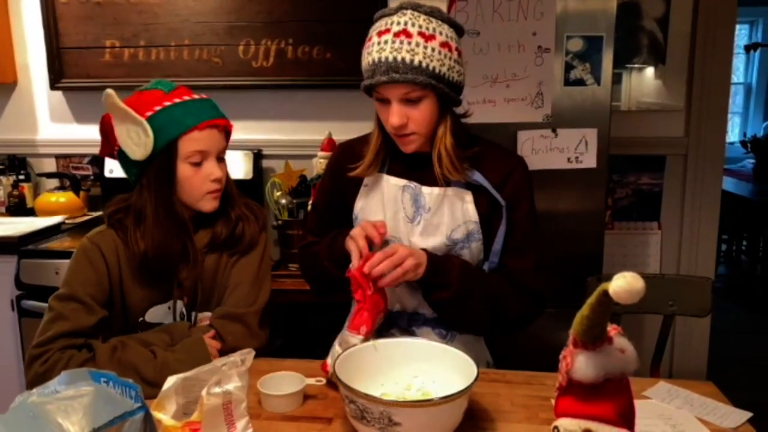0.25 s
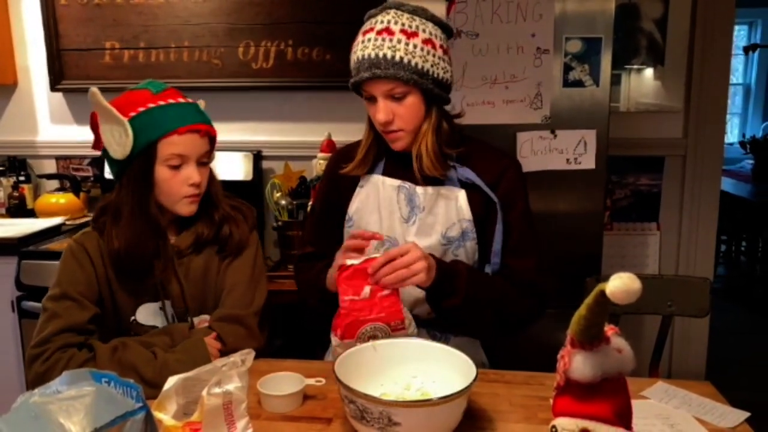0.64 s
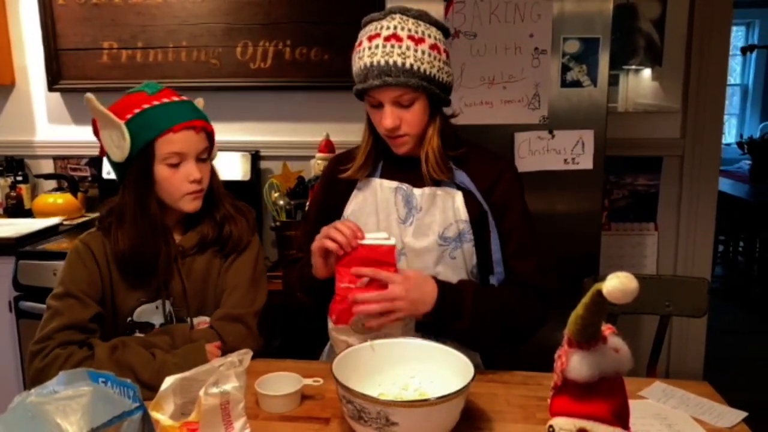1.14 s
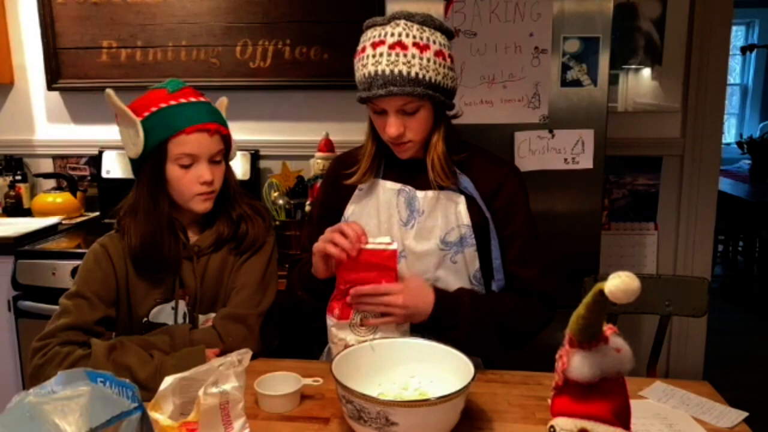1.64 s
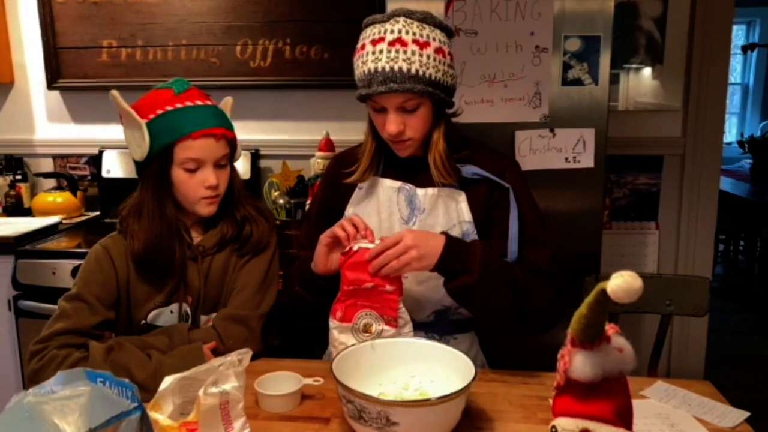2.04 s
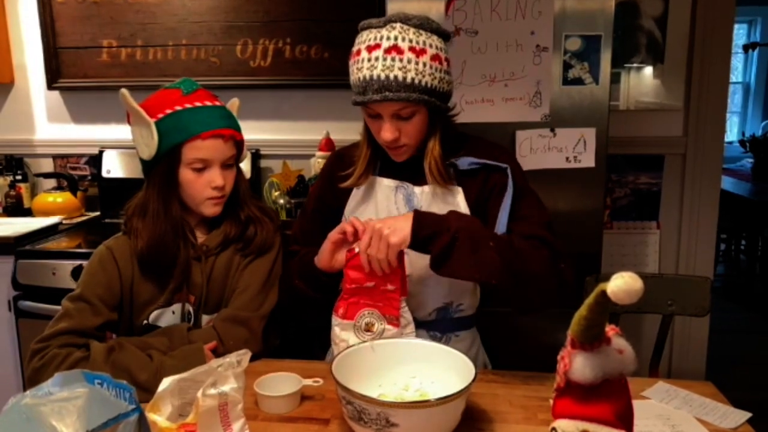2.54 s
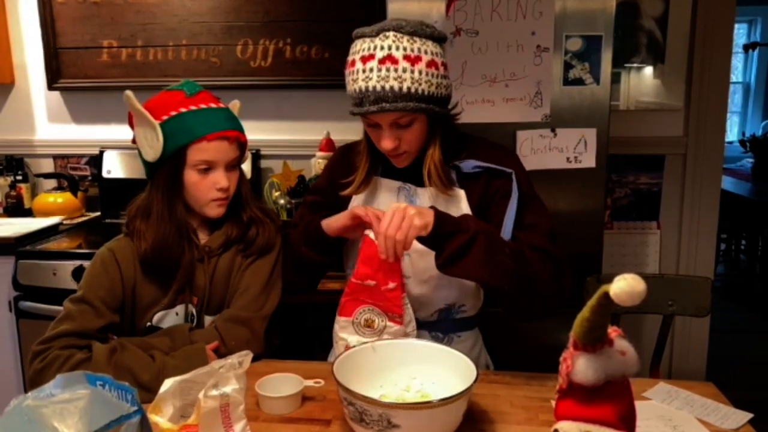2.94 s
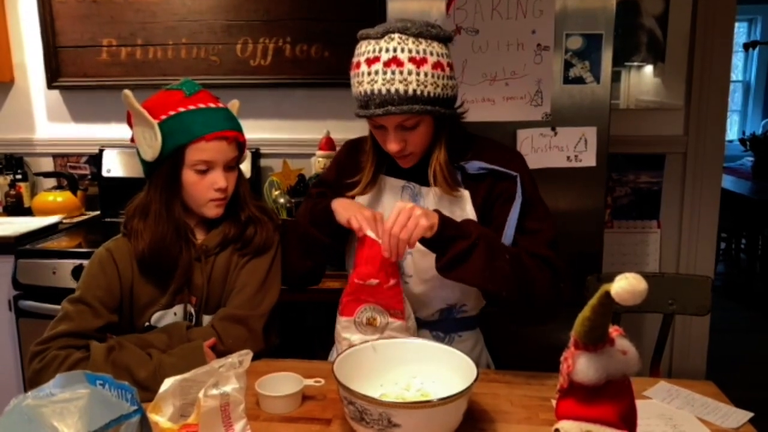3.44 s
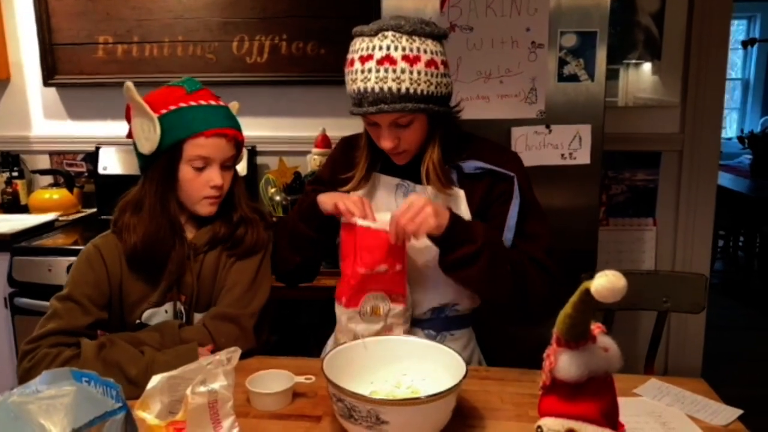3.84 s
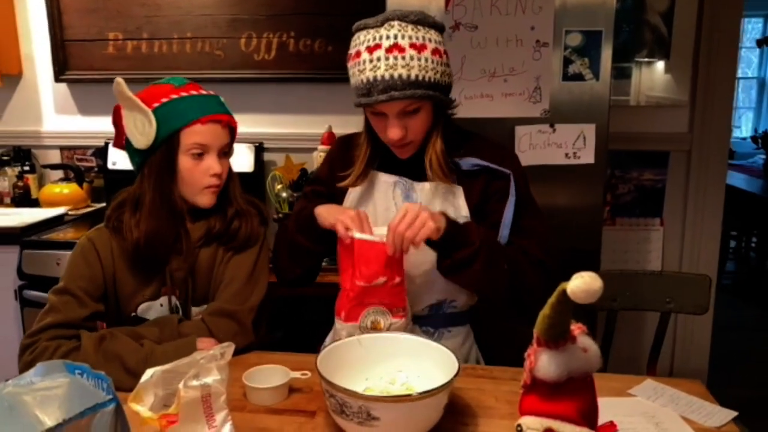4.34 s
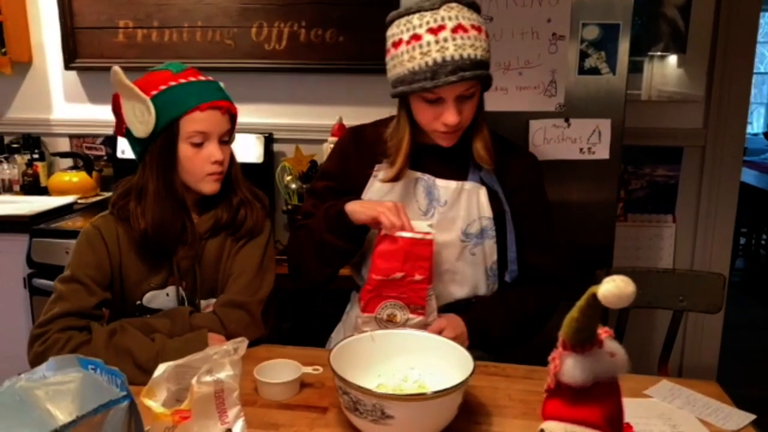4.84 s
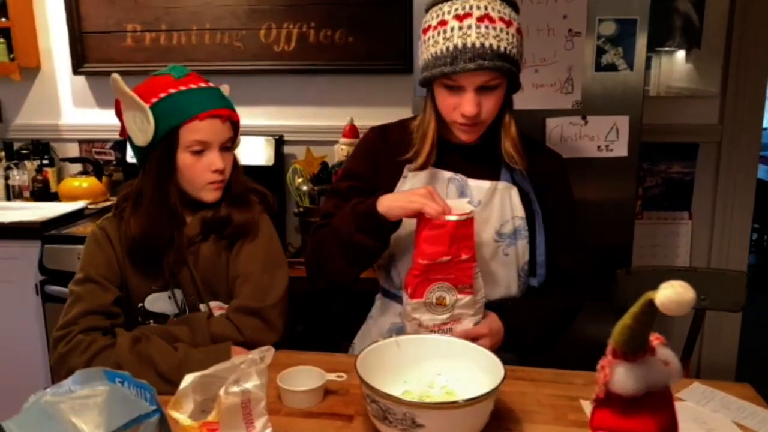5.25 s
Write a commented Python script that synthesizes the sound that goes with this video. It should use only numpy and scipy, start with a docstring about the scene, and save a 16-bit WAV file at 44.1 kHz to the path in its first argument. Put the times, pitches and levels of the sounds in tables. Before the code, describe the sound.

Crisp paper crinkles irregularly as a flour bag is opened by hand. A few isolated pops lead into a dense burst of hard snaps; it calms to faint rustling, flares again, then thins to small ticks and soft low thuds, closing on a single bright snap. A small lively kitchen, camera-like microphone, quiet rumbling background with slight hiss.

```python
"""Hands unfold a stiff paper bag of flour on a kitchen table: rubbing paper and a few light snaps, a
loud flurry after 1.1 s, a sparser second, another flurry at 2.6-3.6 s, then a thinning to one sharp snap
at 5.42 s. Snaps are noise bursts with short rings, rustle is random grains, with swells of band-passed
noise; thuds are low rings. Decaying noise rings as the kitchen; a shaped noise murmur lies under it all."""
import sys
import numpy as np
from scipy import signal
from scipy.fft import rfft, irfft, next_fast_len
from scipy.io import wavfile
from scipy.ndimage import uniform_filter1d

SR = 44100
rng = np.random.default_rng(int(sys.argv[2]) if len(sys.argv) > 2 else 0)


def waveform_to_disk(signal):
    """Save audio, clipped to [-1, 1], as 16-bit WAV at the path in sys.argv[1]."""
    frames = np.transpose(np.atleast_2d(signal))
    scaled = np.clip(frames, -1, 1) * 32767
    samples = np.round(scaled).astype(np.int16)
    wavfile.write(sys.argv[1], SR, samples)


N = 242902

# Creases that snap. Each row: time in s, panel level in dB, panel pitch in Hz, bag-air level in dB,
# crack level in dB, crack centre in Hz, left-right balance in dB.
CREASE_SNAPS = [(0.22, -52.5, 1400, -62, -47, 6160, 1), (0.2555, -44, 2000, -63, -42.5, 6640, 1),
                (0.266, -32.5, 2000, -41, -32.5, 5950, -2), (0.346, -47.5, 1390, -61, -45, 4400, -3),
                (0.37, -48.5, 1540, -56, -45, 4830, 0), (0.413, -43.5, 1970, -52.5, -49, 4330, 1),
                (0.433, -43, 1750, -60, -59, 3910, 1), (0.601, -52.5, 1960, -61, -44, 5700, -2),
                (0.664, -48.5, 1550, -45.5, -49, 6730, -1), (0.741, -46, 2100, -47, -42, 7200, 1),
                (0.783, -43, 1960, -61, -63, 5270, -3), (0.867, -42.5, 2070, -52.5, -42, 7400, -1),
                (0.893, -31, 2010, -44.5, -30, 5560, -1), (1.01, -49.5, 1730, -61.5, -52, 5190, -6),
                (1.066, -42.5, 1860, -48.5, -47.5, 4600, -1), (1.117, -46, 2320, -57, -50, 5000, 2),
                (1.136, -38.5, 1870, -34.5, -41, 4490, -3), (1.147, -28.5, 2100, -34, -30.5, 3870, 1.5),
                (1.163, -25.5, 1640, -57, -23.5, 3430, -1), (1.188, -36, 1930, -36.5, -53, 4400, 4),
                (1.201, -31, 1870, -36.5, -50, 4400, 1), (1.229, -36, 2270, -39.5, -34, 4300, 15),
                (1.235, -20.5, 2330, -25.5, -20.5, 8030, -5), (1.286, -37.5, 1780, -33, -54, 5870, 5),
                (1.303, -35.5, 1720, -48, -38, 5320, -3), (1.348, -26, 2000, -30, -48, 5260, -2),
                (1.355, -25, 2320, -26.5, -26.5, 6400, 1), (1.372, -44, 1730, -37.5, -52, 4800, -2),
                (1.385, -31, 2030, -49, -38, 4430, 0), (1.442, -58, 1970, -41.5, -61, 5560, 1),
                (1.602, -41.5, 2080, -50.5, -41, 5000, -2), (1.699, -44, 2600, -54.5, -41.5, 5370, -3),
                (1.863, -48.5, 2220, -58, -50, 4260, 1), (1.89, -44.5, 2200, -54.5, -36.5, 4800, -9.5),
                (1.994, -55, 1850, -52, -57, 4770, 3), (2.018, -54, 2140, -52, -48.5, 6000, -1),
                (2.11, -54.5, 1710, -60.5, -45, 5800, 1), (2.24, -44, 1750, -54, -53, 4560, -2),
                (2.266, -55, 1590, -53.5, -51, 4800, 0), (2.289, -50, 1630, -55, -66, 5630, -2),
                (2.359, -39, 1780, -39.5, -45, 4030, -0.5), (2.451, -39.5, 1890, -59, -44.5, 4830, -3),
                (2.565, -36.5, 1960, -48, -40.5, 4300, 0), (2.6, -23, 1920, -41, -33.5, 4230, -0.5),
                (2.647, -28, 1800, -47, -32.5, 4530, 0.5), (2.687, -31.5, 1560, -45, -31, 4170, 0),
                (2.721, -30, 1330, -34.5, -54, 4320, -2), (2.746, -30, 1880, -45, -26.5, 5950, -1),
                (2.767, -30, 1700, -51, -32, 5550, 2), (2.8, -36, 1270, -32.5, -59, 5180, 3),
                (2.819, -24.5, 1820, -32, -31.5, 5560, -0.5), (3.036, -41.5, 1380, -73, -53.5, 4710, 1),
                (3.057, -52, 2040, -52, -47, 4100, 1), (3.146, -54, 1310, -55, -45, 4330, 0),
                (3.183, -51, 1120, -53, -57, 6070, -4), (3.253, -35.5, 1730, -44, -45, 4850, -2),
                (3.259, -31, 1180, -35.5, -30, 4600, -0.5), (3.279, -32.5, 1350, -42, -46, 4670, -2),
                (3.288, -37.5, 1210, -52, -47, 5000, 6), (3.343, -36, 1810, -45, -43.5, 4140, 1),
                (3.368, -28, 2180, -41.5, -36, 4300, -2), (3.383, -30, 1910, -34.5, -49, 4410, 0),
                (3.479, -33, 1820, -43.5, -50, 3910, -2), (3.545, -38, 1810, -52, -49, 4410, -4),
                (3.568, -40, 2060, -72, -38.5, 4840, 1), (3.605, -36.5, 1290, -45, -48, 3900, -2),
                (3.83, -56, 1660, -59, -64, 4830, -1), (3.841, -51.5, 1560, -53.5, -50.5, 3900, 0),
                (3.913, -48, 1120, -48, -48, 6400, 1), (3.982, -46, 1260, -38.5, -62, 6340, 0.5),
                (4.034, -55, 1380, -39, -75, 4300, 2), (4.102, -52, 1195, -63, -87, 6200, 0.5),
                (4.113, -47.5, 1270, -40, -58.5, 4880, 1), (4.287, -52.5, 2120, -52, -57, 4640, 0),
                (4.317, -39.5, 1550, -40, -57, 3820, -1), (4.343, -52, 1290, -51, -75, 4740, 5),
                (4.402, -48, 1620, -50.5, -44, 6150, 0), (4.55, -53, 1840, -61, -53.5, 4820, -2),
                (4.881, -54, 1680, -60, -53, 6950, -2), (4.909, -43, 1520, -77, -58, 4780, -3),
                (5.206, -57, 1940, -62, -59.5, 6700, 0), (5.279, -44.5, 1560, -55, -81, 5360, -1),
                (5.292, -50, 1460, -66, -58.5, 4850, -1), (5.419, -31.5, 1420, -43, -33.5, 6150, -1.5),
                (5.489, -63, 1460, -58, -45.5, 5530, -8)]


def snaps():
    """Each crease tears open in a noise burst, pops the panel beside it, then squeezes the air in the bag."""
    # Air pitch as the bag is folded, squeezed and opened. Each row: time in s, pitch in Hz.
    bag_air_hz = [(.3, 437), (.9, 627), (1.3, 640), (2.1, 500), (2.4, 705), (2.8, 523), (3.3, 654),
                  (4.0, 498), (4.3, 416), (5.28, 650), (5.42, 530)]
    full_tear_s, tear_spread_db = 0.001, 2
    full_force_db, slowing = -25, 0.15  # weaker creases tear slower, by this share of the dB they lack
    out = np.zeros((2, N))
    noises = rng.standard_normal((len(CREASE_SNAPS), 2, 2048))
    for row, noise in zip(CREASE_SNAPS, noises):
        s, panel_db, panel_hz, air_db, crack_db, crack_hz, balance_db = row
        lacking_db = full_force_db - max(panel_db, crack_db)
        tear_db = tear_spread_db * noise[0, 0] + slowing * lacking_db
        tear_s = np.clip(full_tear_s * gain_of(tear_db), 0.0003, 0.006)
        fine = tear_burst(noise[0], tear_s, pulse=3.9)
        coarse = tear_burst(noise[1], tear_s, pulse=5.23)

        coloured = np.convolve(fine, ring(crack_hz, 0.39, size=64))[:2048]
        crack = 0.45 * peaked(np.diff(fine, prepend=0)) + 1.1 * peaked(coloured)
        pop = np.convolve(coarse, ring(panel_hz, 0.52, size=256))[:2048]
        air = ring(np.interp(s, *np.transpose(bag_air_hz)), 0.65, size=2048)

        sides = gain_of([[balance_db / 2], [-balance_db / 2]])
        paper = gain_of(panel_db) * peaked(pop) + gain_of(crack_db) * peaked(crack)
        add(out, s - 0.0003, paper * sides)
        add(out, s + 0.94 * tear_s, gain_of(air_db) * air * sides)
    return out


def tear_burst(noise, tear_s, pulse):
    """A short noise burst with one stronger leading pulse, its spectrum flattened so it sounds even."""
    u = np.arange(len(noise)) / SR / tear_s
    swell = np.sqrt(u * np.exp(1 - u))
    burst = noise * swell
    add(burst, 0.8 * tear_s, np.array([pulse]))
    z = rfft(burst)
    flatter = z / (np.abs(z) + 1e-9) ** 0.7
    return irfft(flatter, len(noise)) * swell


def rustle():
    """Dense clumps of tiny buckles of every size over the soft hiss of rubbing."""
    # Grain colour. Each row: frequency in Hz, relative level in dB per Hz.
    paper_colour = [(71, -42), (120, -11), (289, -9), (377, -4.5), (644, -5), (999, -9.5), (1610, -7.5),
                    (6870, -16), (8640, -26.5), (10700, -17.5), (11500, -38), (15000, -68), (22000, -120)]
    buckles_per_s = 2500
    clumps = evened(uniform_filter1d(uniform_filter1d(rng.standard_normal(N), size=400), size=400))
    chance, big, patch = rng.random((3, N))
    sizes = gain_of(-3.0 * np.log(big + 0.0073) + 2.0 * clumps) * (chance < buckles_per_s / SR)
    rub = 0.56 * np.sqrt(np.mean(sizes ** 2)) * gain_of(2.4 * clumps) * rng.standard_normal(N)

    pitches_hz = np.geomspace(150, 10500, num=28)
    parts = np.zeros((3, N))  # hollow, middle, crisp
    for k, hz in enumerate(pitches_hz):
        grain = ring(hz, 1.0, size=2048)
        grain = grain / np.linalg.norm(grain) * np.sqrt(hz) * gain_of(read(paper_colour, hz))
        buckles = sizes * (np.floor(patch * len(pitches_hz)) == k)
        train = buckles + np.roll(rub, k * 7) / np.sqrt(len(pitches_hz))
        parts[int(hz > 850) + int(hz > 3300)] += signal.oaconvolve(train, grain)[:N]
    powers = rubbing() + settling()
    return sum(np.sqrt(power) * evened(part) for power, part in zip(powers, parts))


def rubbing():
    """Power of the three parts of the rustle: each rub of the fingers rises, holds and fades."""
    # Each row: start in s, length in s, level in dB, hollow and crisp part in dB against that level.
    rubs = [(0, 0.046, -63, -5.5, -2.5), (0.226, 0.13, -62, -2.5, -2), (.35, 0.12, -66.5, 1, -5),
            (0.538, 0.075, -72, 2, 5.5), (0.718, 0.076, -67.5, 3, 0), (.93, 0.14, -69.5, -5, 1),
            (1.02, 0.11, -64.5, -8, -1.5), (1.13, 0.066, -56.5, -14, -12), (1.27, 0.15, -53, -13, -14),
            (1.52, 0.18, -67, -4.5, 0), (1.65, 0.099, -66, -2, -0.5), (1.798, 0.15, -70.5, -1.5, 0.5),
            (2.0, 0.068, -76.5, 0.5, 1.5), (2.11, 0.11, -78, 0, 3.5), (2.25, 0.13, -72.5, 4.5, 0.5),
            (2.37, 0.054, -65, -3, -2.5), (2.45, 0.057, -62, -2, -2.5), (2.62, 0.085, -59.5, -2, 0.5),
            (2.73, 0.15, -54, -3.5, -32), (3.029, 0.098, -71.5, 0.5, -1.5), (3.149, 0.073, -65.5, 0, -6.5),
            (3.28, 0.14, -57, -4.5, -13.5), (3.48, 0.16, -65, -3, -9.5), (3.83, 0.052, -70.5, 0.5, -6.5),
            (3.915, .06, -72.5, 2.5, -5), (4.115, 0.033, -72.5, 5, -4), (4.29, 0.053, -72, -6, -8),
            (4.375, 0.092, -72.5, 2, 2.5), (4.53, 0.046, -77, 0, 1), (4.72, 0.091, -75.5, 0, 0.5),
            (4.869, 0.031, -77, 0, 1), (5.07, 0.065, -80.5, -2.5, -0.5), (5.204, .015, -73.5, -2, 1.5),
            (5.28, 0.085, -77, 7.5, 4.5), (5.39, 0.1, -65.5, -7, -2)]
    # Bag merely held: level in dB of the hollow, middle and crisp part.
    hold_db = (-80, -76, -93)
    rise_s, fade_db_per_s = 0.0047, 301
    out = gain_of(hold_db)[:, None] ** 2 * np.ones(N)
    t = np.arange(SR // 2) / SR
    for s, length_s, db, hollow_db, crisp_db in rubs:
        fade_db = fade_db_per_s * np.maximum(t - length_s, 0)
        shape = np.minimum(t / rise_s, 1) * gain_of(db - fade_db)
        add(out, max(s, 0), (gain_of([[hollow_db], [0], [crisp_db]]) * shape) ** 2)
    return out


def settling():
    """Power of the crinkling that bag air, panel and crack of every snap leave behind them."""
    # Rows for the hollow, middle and crisp part: level in dB against the snap's, 60 dB decay time in s.
    crinkle = [(-24.5, 0.44), (-35, 0.24), (-32.5, 0.25)]
    rise_s = 0.0049
    out, t = np.zeros((3, N)), np.arange(SR // 2) / SR
    below_db, t60_s = np.transpose(crinkle)[..., None]
    fade = (gain_of(below_db - 60 * t / t60_s) * np.minimum(t / rise_s, 1)) ** 2
    for s, panel_db, _, air_db, crack_db, *_ in CREASE_SNAPS:
        add(out, s, gain_of([[air_db], [panel_db], [crack_db]]) ** 2 * fade)
    return out


def noise_swells():
    """Short lumpy noise swells, some narrow and scraping, some broad bright rustle, each band-passed."""
    # Each row: start in s, length in s, level in dB, centre in Hz, width in Hz.
    swells = [(.001, 0.03, -60.5, 1340, 1720), (0.544, 0.066, -67, 2060, 895),
              (2.147, 0.095, -71.5, 2090, 590), (2.368, 0.033, -57.5, 7050, 7200),
              (2.459, 0.047, -60.5, 6550, 7950), (2.705, 0.02, -47, 1130, 497),
              (2.805, 0.013, -39.5, 580, 300), (3.143, 0.021, -55, 1256, 340),
              (3.18, 0.054, -57, 1180, 400), (4.534, 0.026, -70.5, 1940, 920),
              (4.757, 0.0174, -62.5, 1770, 500), (4.883, 0.022, -64.5, 1660, 494),
              (5.074, 0.06, -72.5, 1300, 695), (5.385, 0.042, -66, 8200, 7000),
              (5.482, 0.014, -53.5, 5500, 1200)]
    out = np.zeros(N)
    noises = rng.standard_normal((len(swells), 2, 8000))
    for (s, length_s, db, hz, width_hz), noise in zip(swells, noises):
        edges_hz = [max(hz - width_hz / 2, 100), min(hz + width_hz / 2, 12000)]
        band = signal.butter(2, edges_hz, "band", fs=SR)
        lumps = gain_of(0.48 * evened(uniform_filter1d(noise[1], size=200)))
        size = int(np.clip(length_s, 0.005, 0.15) * SR)
        swell = evened(signal.lfilter(*band, noise[0] * lumps))[1000:1000 + size]  # skips the filter's onset
        add(out, s, gain_of(db) * swell * signal.windows.tukey(len(swell), 0.4))
    return out


def thuds():
    """The heavy bag bumps the table: dull pushes of a few cycles that sag in pitch as the flour settles."""
    # Each row: row time in s, level in dB, pitch in Hz.
    bumps = [(0.259, -61, 294), (1.34, -47.5, 200), (1.93, -55, 182), (2.144, -53.5, 179),
             (2.178, -57, 250), (2.663, -48, 112), (3.026, -56, 231), (3.193, -49.5, 194),
             (3.266, -56, 131), (3.351, -41.5, 200), (3.576, -45, 248), (3.622, -55, 151),
             (3.912, -41.5, 249), (3.982, -42, 280), (4.114, -43.5, 200), (4.27, -66, 72),
             (4.286, -51.5, 182), (4.357, -52, 139), (4.817, -61, 176), (5.083, -59.5, 178),
             (5.419, -50.5, 260)]
    out = np.zeros(N)
    for s, db, hz in bumps:
        push_s = s + 0.8 / hz  # the dull push starts 0.8 cycles after the row's time
        add(out, push_s, gain_of(db) * ring(hz, 0.56, size=4096))
        add(out, push_s + 1.64 / hz, gain_of(db - 7) * ring(0.59 * hz, 0.35, size=4096))
    return out


def ports(x):
    """The direct sound reaches two ports in the camera body with its own delay and shading."""
    # Each row: frequency in Hz, phase lead of the left in radians.
    left_lead_rad = [(500, .05), (900, -.2), (1800, .01), (2600, -.3), (3100, -1.9), (3900, -2.2),
                     (4800, -1.4), (5500, -2.1), (6300, -.8), (8000, -2.2), (9500, -1.6), (11000, -.3)]
    # Each row: frequency in Hz, left-right balance in dB.
    port_balance_db = [(125, 1.3), (900, 2.6), (2200, 2.2), (3100, 7), (3900, -.5), (4300, -5), (5500, -7),
                       (6400, -1.2), (9300, -2.1), (11000, -.8)]
    size = next_fast_len(N + 2048)
    hz = np.fft.rfftfreq(size, 1 / SR)
    half = gain_of(read(port_balance_db, hz) / 2) * np.exp(1j * read(left_lead_rad, hz) / 2)
    return irfft(rfft(x, size) * np.array([half, 1 / half]), size)[:, :N]


def kitchen(x):
    """Diffuse tails, bands dying at their own speed; three take turns so no fixed colouring stands out."""
    # Each row: frequency in Hz, 60 dB decay time in s.
    decay_s = [(150, 0.35), (660, 0.27), (1740, 0.23), (4600, 0.36), (10000, 0.28)]
    # Each row: frequency in Hz, reverberant level in dB.
    tail_db = [(150, -0.5), (600, -2), (1200, 1), (2500, -4), (5000, -0.5), (10000, -3.5)]
    # Each row: frequency in Hz, left-right likeness from -1 to 1.
    tail_likeness = [(100, .93), (270, .75), (550, .1), (1200, -.1), (2500, .1), (6000, .05)]
    rise_s, half_cycles_per_s = 0.0013, 2.287
    hz, t = np.fft.rfftfreq(512, 1 / SR), np.arange(220) * 128 / SR
    t60_s = read(decay_s, hz)[:, None]
    colour = gain_of(read(tail_db, hz))[:, None]
    turn = np.arange(N) / SR * half_cycles_per_s
    out = 0
    for k in range(3):
        z = pair(read(tail_likeness, hz), len(t)) * gain_of(-60 * t / t60_s) / np.sqrt(t60_s)
        flat = signal.istft(z, nperseg=512, noverlap=384)[1]
        tail = signal.istft(z * colour, nperseg=512, noverlap=384)[1]
        rise = np.clip(np.arange(tail.shape[1]) / SR / rise_s, 0, 1)
        tail = tail * rise / np.linalg.norm(flat[0])
        share = np.sqrt(2 / 3) * np.cos(np.pi * (turn + k / 3))  # the three powers sum to 1
        out = out + signal.fftconvolve((x * share)[None], tail, axes=1)[:, :N]
    return out


def hush():
    """Murmur of the house and hiss of the microphones: shaped noise, gently patchy, with swelling rumble."""
    # Each row: frequency in Hz, relative level in dB per Hz.
    hush_colour = [(12, -33), (25, -10.5), (50, 0), (90, -5.5), (200, -17.5), (400, -19.5), (1740, -34),
                   (3000, -26.5), (5000, -26), (8000, -32.5), (10300, -28.5), (11000, -28)]
    # Each row: frequency in Hz, left-right likeness.
    hush_likeness = [(50, 0.95), (300, 0.52), (1000, .3), (5000, 0.12)]
    # Each row: time in s, swell of the low rumble in dB.
    rumble_db = [(0, -1), (.5, 2.5), (1, 2), (1.5, 0), (2, 2.5), (2.5, 2.5), (3, 3.5), (3.5, -5.5),
                 (3.999, 5), (4.4, 8.5), (4.7, -9), (5.5, 2)]
    level_db, patch_db, rumble_top_hz = -69, 2.0, 200
    frames, hz = N // 256 + 5, np.fft.rfftfreq(1024, 1 / SR)
    patches = rng.standard_normal((frames, 513)).T
    patches = evened(uniform_filter1d(uniform_filter1d(patches, size=8, axis=0), size=20, axis=1))
    swell_db = np.interp(np.arange(frames) * 256 / SR, *np.transpose(rumble_db))
    swell_db = swell_db / (1 + (hz[:, None] / rumble_top_hz) ** 4)
    shape_db = read(hush_colour, hz)[:, None] + patch_db * patches + swell_db
    z = pair(read(hush_likeness, hz), frames) * gain_of(shape_db)
    return gain_of(level_db) * evened(signal.istft(z, nperseg=1024, noverlap=768)[1][:, :N])


def suppress(x, margin_db=9.5, slope=0.55):
    """Noise suppressor: bands that sink near their quietest level are pushed further down."""
    hz, _, z = signal.stft(x, SR, nperseg=512)
    power = (np.abs(z) ** 2).mean(0)
    power = uniform_filter1d(uniform_filter1d(power, size=15, axis=0), size=5, axis=1)
    level_db = 10 * np.log10(np.abs(power) + 1e-16)
    quiet_db = np.percentile(level_db, 5, axis=1, keepdims=True)
    active = ((hz > 400) & (hz < 10500))[:, None]
    cut_db = slope * np.clip(quiet_db + margin_db - level_db, 0, 15) * active
    return signal.istft(z / gain_of(cut_db), SR, nperseg=512)[1][:, :N]


def gain_of(db):
    """Amplitude factor of a level in dB."""
    return 10 ** (np.asarray(db) / 20)


def evened(x):
    """Scale to an RMS of 1."""
    return x / np.sqrt(np.mean(x ** 2) + 1e-20)


def peaked(x):
    """Scale to a peak of 1."""
    return x / np.abs(x).max()


def read(points, hz):
    """Interpolate a frequency curve along log frequency."""
    f, value = np.transpose(points)
    return np.interp(np.log(hz + 1), np.log(f + 1), value)


def add(mix, s, sound):
    """Add a sound into the mix from s seconds on, cut at the end."""
    part = mix[..., round(s * SR):][..., :sound.shape[-1]]
    part += sound[..., :part.shape[-1]]


def ring(hz, cycles, size):
    """A soft-started sine that dies within a few cycles, envelope peak 1."""
    turns = np.arange(size) / SR * hz
    u = turns / cycles
    return u * np.exp(1 - u) * np.sin(2 * np.pi * turns)


def pair(same, frames):
    """Two random short-time spectra that are alike by the share given for each bin."""
    a, b, c, d = rng.standard_normal((frames, len(same), 4)).T
    same = np.clip(same, -1, 1)[:, None]
    left, other = a + 1j * b, c + 1j * d
    return np.array([left, same * left + np.sqrt(1 - same ** 2) * other])


def scene():
    """Bag heard directly and through the kitchen, over the hush."""
    sheet_low_hz = 130  # thin paper moves little air below this
    high_pass = signal.butter(2, sheet_low_hz, "high", fs=SR, output="sos")
    paper = signal.sosfilt(high_pass, snaps() + rustle() + noise_swells())
    bag = paper + thuds()
    return ports(bag) + kitchen(bag.mean(0)) + hush()


def record(dry):
    """Microphones that lose the deepest bass and lift treble bands; the suppressor; the band limit."""
    # Each row: frequency in Hz, response in dB.
    microphone_db = [(15, -21), (30, -12.5), (50, 2.5), (2500, -0.5), (3500, 4), (5000, 1), (6500, -2),
                     (8500, 3.5), (9500, 4.5), (10500, 1.5), (11200, -2)]
    edge_hz = 11150
    size = next_fast_len(N + 8192)
    response = gain_of(read(microphone_db, np.fft.rfftfreq(size, 1 / SR)))
    heard = irfft(rfft(dry, size) * response, size)[:, :N]
    low_pass = signal.firwin(401, edge_hz, window=("kaiser", 7), fs=SR)
    return signal.oaconvolve(suppress(heard), low_pass[None], "same")


dry = scene()
out = record(dry)
waveform_to_disk(out)
```